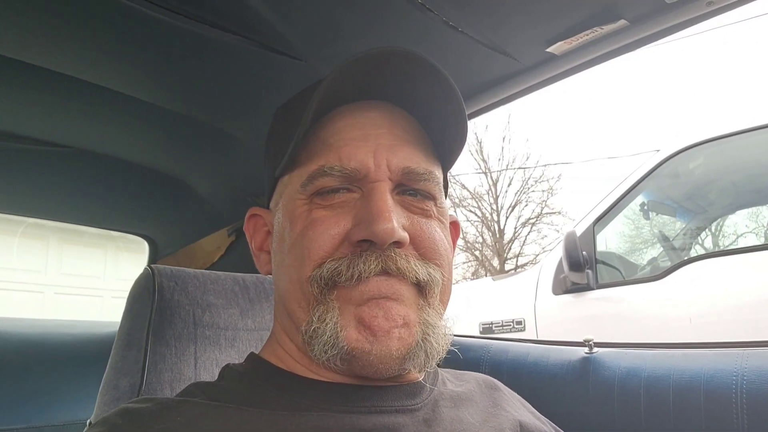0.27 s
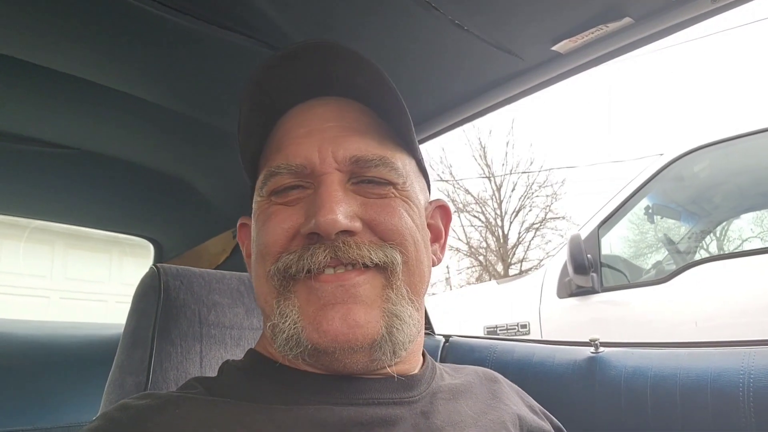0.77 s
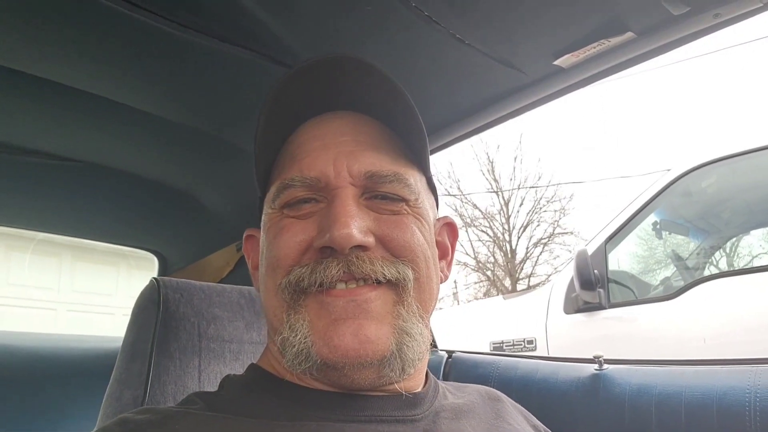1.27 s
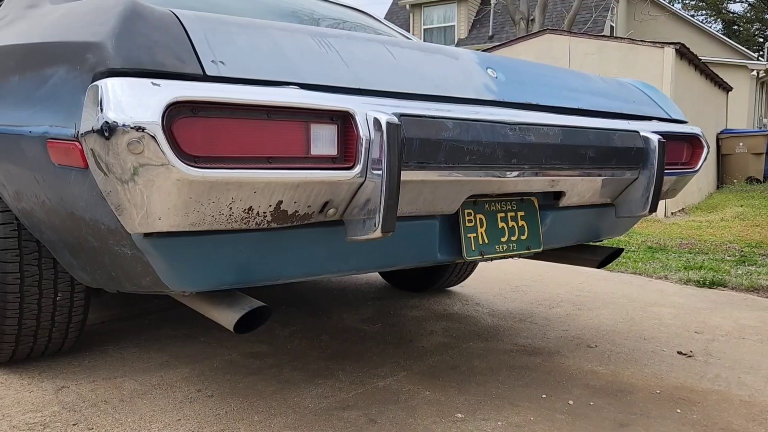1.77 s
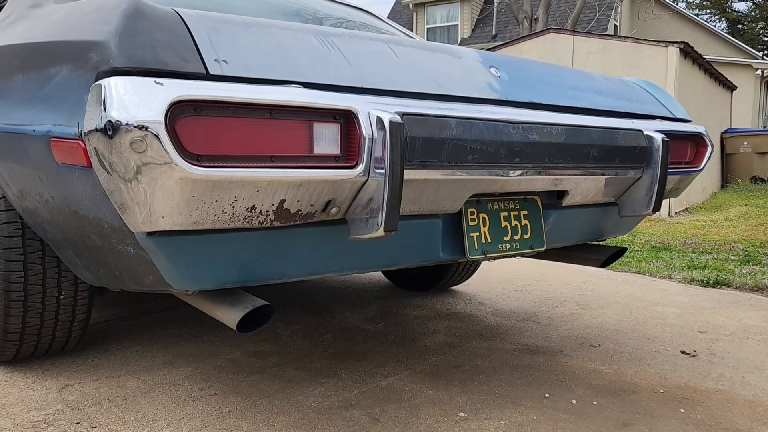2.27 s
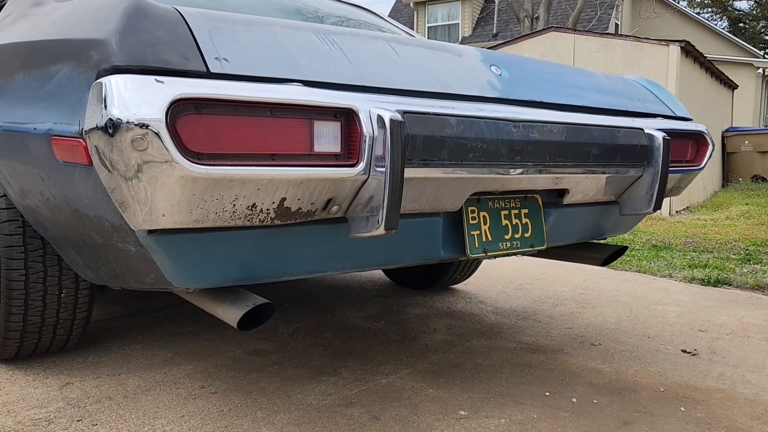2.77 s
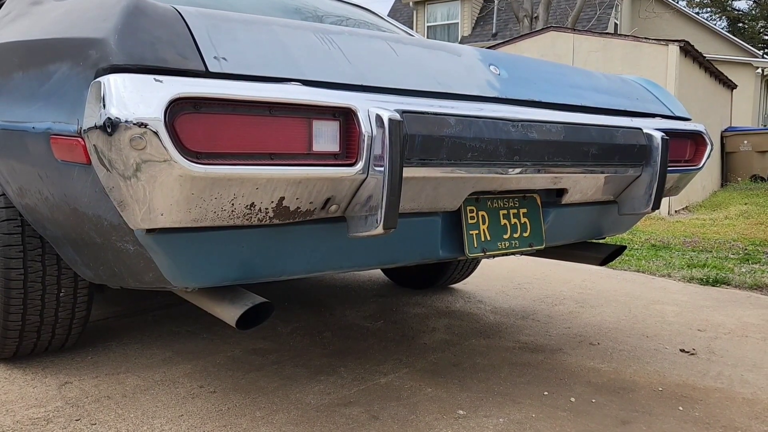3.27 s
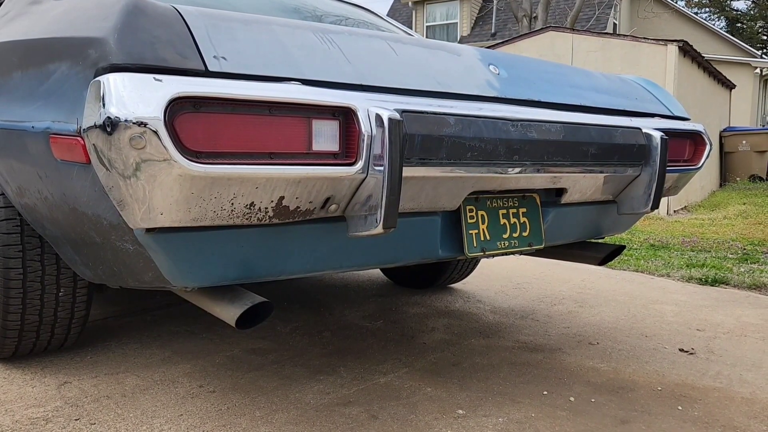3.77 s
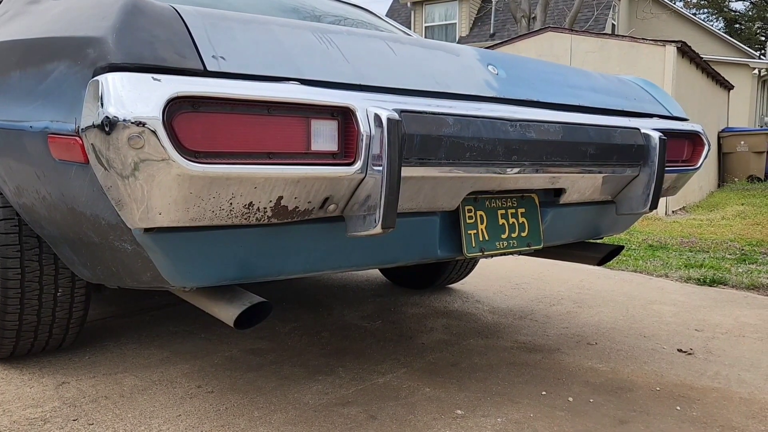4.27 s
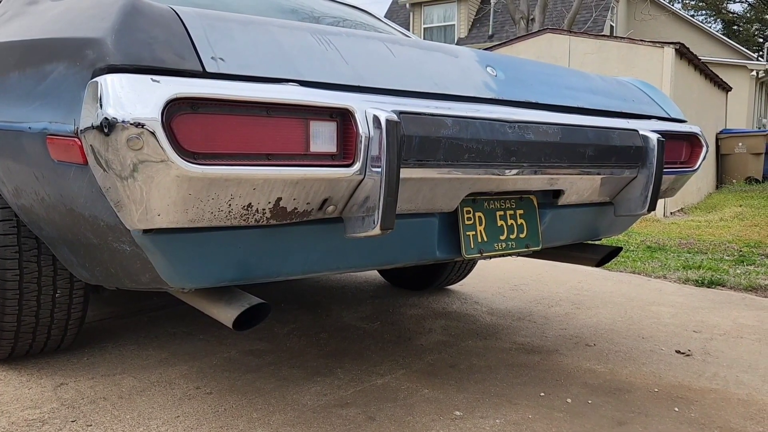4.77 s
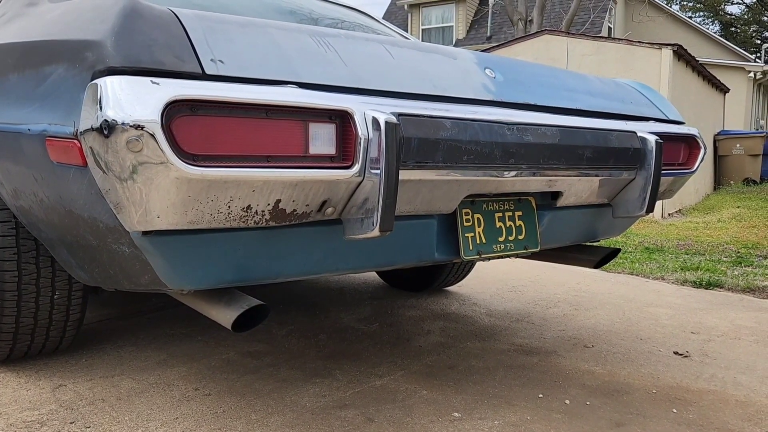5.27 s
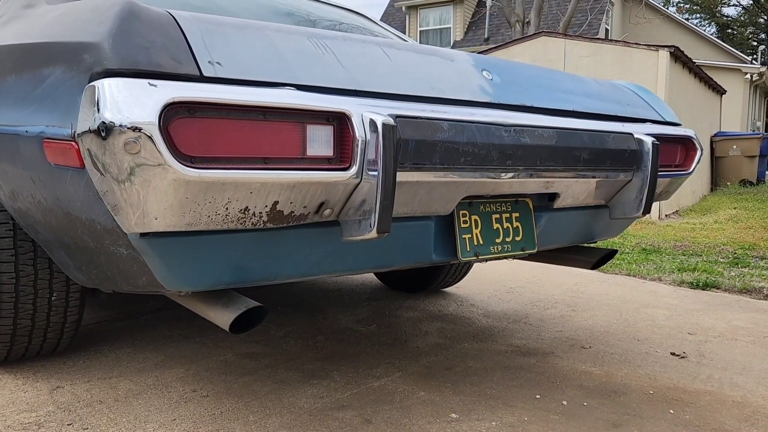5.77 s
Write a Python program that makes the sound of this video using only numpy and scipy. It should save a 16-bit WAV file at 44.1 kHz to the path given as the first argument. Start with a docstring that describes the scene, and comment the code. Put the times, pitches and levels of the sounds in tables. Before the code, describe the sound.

After a quiet outdoor moment, a starter clashes and whines, and a large petrol engine fires up and idles with throbbing exhaust.

```python
"""A big V8 with twin tailpipes starts on a driveway, heard from just behind the bumper.
Over faint outdoor air a soft hiss flares twice, small birds whistle and a hand bumps the microphone.
At 1.9 s the starter pinion clashes into the flywheel and cranks for half a second.
At 2.4 s the engine catches with a few hard bangs, then settles to a loping idle near 1000 rpm:
exhaust pulses thump in the pipes, ragged puffs ring them, and gas spits from the near one."""
import sys
import numpy as np
from scipy import signal
from scipy.fft import rfft, irfft, next_fast_len
from scipy.io import wavfile
from scipy.ndimage import uniform_filter1d

SR = 44100
rng = np.random.default_rng(int(sys.argv[2]) if len(sys.argv) > 2 else 0)


def wrap_up_sound(samples):
    """Save the sound to the file named by the first command line argument, as 16-bit audio."""
    columns = np.atleast_2d(samples).T
    # keep every value between -1 and 1, then stretch to whole-number steps
    tamed = np.clip(columns, -1, 1)
    steps = np.round(tamed * 32767).astype(np.int16)
    wavfile.write(sys.argv[1], SR, steps)


N = 265437
TIME, HZ = np.arange(N) / SR, np.fft.rfftfreq(N, 1 / SR)
CATCH_S, BAND_LIMIT_HZ = 2.37, 15700


def amp(db):
    """Decibels to gain."""
    return 10 ** (np.asarray(db) / 20)


def unit(x):
    """Scale to rms 1."""
    return x / np.sqrt(np.mean(x ** 2) + 1e-20)


def read(points, hz):
    """Interpolate a spectrum over log frequency."""
    f, value = np.transpose(points)
    return np.interp(np.log(hz + 1), np.log(f + 1), value)


def wander(hz, hop=16):
    """Random drift of rms 1, rolling off above hz."""
    size = next_fast_len(N // hop + 2)
    rates = np.fft.rfftfreq(size, hop / SR)
    slow = irfft(rfft(rng.standard_normal(size)) * np.exp(-(rates / hz) ** 2), size)
    return unit(np.interp(np.arange(N) / hop, np.arange(size), slow))


def convolve(x, response):
    """Convolve per channel, cut to N samples."""
    return signal.oaconvolve(np.atleast_2d(x), np.atleast_2d(response), axes=1)[:, :N]


def body(spectrum, modes=(), size=8192):
    """Minimum-phase impulse response of a spectrum plus resonant peaks."""
    hz = abs(np.fft.fftfreq(size, 1 / SR))
    peaks_db = sum(lift / (1 + (2 * (hz - f) / width) ** 2) for f, width, lift in modes)
    log_gain = np.log(amp(read(spectrum, hz) + peaks_db))
    return np.fft.ifft(np.exp(signal.hilbert(log_gain).conj())).real


def colour(x, spectrum, modes=()):
    """Filter with unity power gain for white noise."""
    response = body(spectrum, modes)
    return convolve(x, response / np.linalg.norm(response))


# Likeness of the two microphone ports: (frequency [Hz], correlation [ratio, clipped to 1])
PORT_LIKENESS = [(100, 1), (350, 0.82), (700, 1.2), (1400, 0.47), (3000, 0.05), (6000, 0), (14000, 0.3)]
def noise():
    """Stereo white noise, alike in the bass, less so in the treble."""
    common, separate = rfft(rng.standard_normal((2, N)))
    same = np.clip(read(PORT_LIKENESS, HZ), 0, 1)
    return irfft(np.array([common, same * common + np.sqrt(1 - same ** 2) * separate]), N)


def swirl(x, patchy_db=3.5):
    """Turbulence: random gain patches in time and frequency."""
    spectra = signal.stft(x, nperseg=512, noverlap=384)[2]
    patches = rng.standard_normal(spectra.shape[:0:-1])
    patches = uniform_filter1d(uniform_filter1d(patches, size=7, axis=0), size=4, axis=1)
    gain = unit(amp(patchy_db * unit(patches)))
    return signal.istft(spectra * gain.T, nperseg=512, noverlap=384)[1][:, :N]


def swell(start_s, length_s, attack_s, fade_db_per_s):
    """Envelope: rise, hold until length_s, fade."""
    age = TIME - start_s
    return np.clip(age / attack_s, 0, 1) * amp(-fade_db_per_s * np.maximum(age - length_s, 0))


def clicks(s, db):
    """One impulse at each time."""
    at = np.clip(np.round(np.asarray(s) * SR).astype(int), 0, N)
    return np.bincount(at, amp(db), N + 1)[:N]


def puffs(s, db, rise_s, decay_s):
    """Envelope: quick rise and slower fall at each time."""
    t = TIME[:SR // 4]
    shape = (1 - np.exp(-(t / rise_s) ** 2)) * np.exp(-t / decay_s)
    return convolve(clicks(s, db), shape / shape.max())[0]


def from_left(x, lag_s):
    """A source on the left reaches the right port later."""
    return np.array([x[0], np.pad(x[-1], (round(lag_s * SR), 0))[:N]])


def underbody(x, wet_db, decay_s=0.0056, count=40):
    """Early reflections off concrete, bumper and floor pan."""
    echoes = np.zeros((2, SR // 30))
    at = rng.integers(SR // 2000, echoes.shape[1], (2, count))
    np.put_along_axis(echoes, at, rng.choice([-1., 1.], at.shape) * np.exp(-at / SR / decay_s), 1)
    echoes *= amp(wet_db) / np.linalg.norm(echoes, axis=1, keepdims=True)
    return (x + convolve(x, echoes)) / np.hypot(1, amp(wet_db))


# Outdoor air, low rumble, soft hiss: (frequency [Hz], relative level [dB])
AIR_SPECTRUM = [(12, -15), (20, -5.5), (62, 4), (108, -11.5), (421, -35), (484, -28), (1080, -35.5),
                (1880, -27), (3090, -18.5), (3970, -32.5), (5240, -29.5), (6910, -35.5), (7510, -38.5),
                (9110, -56), (15000, -51)]
RUMBLE_SPECTRUM = [(30, -21), (70, -1), (110, 4.5), (170, -6), (300, -29.5), (520, -25), (900, -55),
                   (3000, -70)]
FLARE_SPECTRUM = [(120, -54), (200, -13), (534, -17.5), (763, -26), (847, -10), (1070, -14.5),
                  (1860, -14.5), (2130, -3), (3040, -28), (3690, -21), (7000, -65), (9100, -77),
                  (15400, -120)]
# Flares of the hiss: (time [s], level [dB])
HISS_FLARES = [(0, -48.5), (1.315, -55.5)]
def outdoors(air_db=-55, rumble_db=-59.5, outside_s=1.32):
    """Thin air, a hiss that flares and fades, and far-off rumble, fuller once outside the cabin."""
    air = colour(swirl(noise(), patchy_db=1.0), AIR_SPECTRUM) * amp(air_db)
    outside = np.clip((TIME - outside_s) / 0.051, 0, 1)
    rumble = colour(noise(), RUMBLE_SPECTRUM) * amp(rumble_db) * outside
    flare = sum(amp(db) * swell(s, 0.0019, attack_s=0.0019, fade_db_per_s=91) for s, db in HISS_FLARES)
    return air + rumble + colour(noise(), FLARE_SPECTRUM) * flare


# Whistles: (time [s], length [s], pitch [Hz], starting offset [Hz], level [dB])
BIRD_WHISTLES = [(0.209, .06, 4520, 148, -65), (0.341, 0.054, 5080, -300, -59),
                 (0.322, 0.2, 3414, -100, -56), (0.406, 0.14, 5840, 250, -62.5),
                 (1.038, .07, 8750, 350, -80), (1.103, 0.043, 5280, 350, -57),
                 (1.132, 0.17, 6140, -200, -65.5), (1.145, 0.06, 7900, -350, -70),
                 (1.197, 0.039, 7160, 250, -61), (1.222, 0.072, 4680, 300, -55), (1.26, 0.04, 3030, 8, -58),
                 (1.372, 0.055, 5640, 252, -59), (1.489, .18, 5530, 195, -54), (1.65, 0.24, 4080, 450, -54),
                 (1.843, .04, 7300, 150, -70), (1.88, 0.093, 8250, -350, -66)]
# Buzzy chirps: (time [s], pitch [Hz], level [dB])
BIRD_BUZZES = [(.243, 4120, -61), (.372, 4010, -55), (.478, 2950, -59), (.885, 2880, -65),
               (.988, 2980, -66), (1.4, 4080, -59), (1.472, 2890, -59)]
def birds(slide_s=0.0215, whistle_width_hz=68, buzz_s=0.037, buzz_width_hz=460, wet_db=-4):
    """Fluttering whistles slide onto pitch among short buzzes; houses scatter a faint echo."""
    notes = [(*row, whistle_width_hz) for row in BIRD_WHISTLES]
    notes += [(s, buzz_s, hz, 0, db, buzz_width_hz) for s, hz, db in BIRD_BUZZES]
    quaver_hz = 12 * wander(60)
    rasp = unit(uniform_filter1d(rng.standard_normal(N), size=40))
    song = np.zeros(N)
    for s, length_s, pitch_hz, offset_hz, db, width_hz in notes:
        t = TIME[:round(length_s * SR)]
        span = slice(round(s * SR), round(s * SR) + len(t))
        hz = pitch_hz + offset_hz * np.exp(-t / slide_s) + quaver_hz[span] + width_hz * rasp[span]
        tone = np.sqrt(2) * np.sin(2 * np.pi * np.cumsum(hz) / SR)
        song[span] += amp(db) * signal.windows.tukey(len(t), .5) * tone
    flutter_db = 3 * wander(36)
    song *= unit(amp(flutter_db))
    scatter = rng.standard_normal((2, SR // 3)) * np.exp(-TIME[:SR // 3] / 0.045)
    return song + amp(wet_db) * convolve(song, scatter / np.linalg.norm(scatter[0]))


# Bumps: (time [s], pitch [Hz], half-width [s], peak [dB])
HAND_BUMPS = [(.603, 140, 0.013, -27), (1.117, 74.6, 0.018, -40)]
# Scuffs and ticks: (time [s], length [s], level [dB], cutoff [Hz])
HAND_SCUFFS = [(0.309, 0.074, -59.5, 2410), (0.429, 0.053, -60.5, 4670), (0.529, 0.046, -54, 940),
               (0.871, 0.0092, -61, 12000), (1.104, 0.0094, -60, 4000)]
def handling():
    """A hand bumps and rubs the microphone."""
    out = np.zeros(N)
    for s, hz, width_s, db in HAND_BUMPS:
        out += amp(db) * np.exp(-((TIME - s) / width_s) ** 2) * np.cos(2 * np.pi * hz * (TIME - s))
    for s, length_s, db, cutoff_hz in HAND_SCUFFS:
        lowpass = signal.butter(2, cutoff_hz, fs=SR)
        rub = signal.lfilter(*lowpass, rng.standard_normal(round(length_s * SR)))
        out[round(s * SR):][:len(rub)] += amp(db) * unit(rub) * signal.windows.tukey(len(rub), .5)
    return out


# Starter slows on compression, then runs free: (time [s], gear mesh [Hz], effort [dB])
STARTER_RUN = [(1.96, 566, 2), (2.02, 633, -1), (2.13, 620, 1.5), (2.18, 509, -5), (2.225, 530, 0),
               (2.28, 560, 2), (2.35, 645, -0.5), (2.46, 754, 6)]
# Pinion clash, gear rattle, churned air: (frequency [Hz], relative level [dB])
CLASH_SPECTRUM = [(88, -35), (150, -9.5), (367, -2), (429, -17), (553, -1), (622, -16), (918, -21),
                  (1180, -21), (1460, 2.5), (2290, -8.5), (3070, -6), (5200, -10.5), (15800, -31)]
RATTLE_SPECTRUM = [(120, -32), (200, -7), (386, -13.5), (439, -5), (472, -14.5), (656, -0.5), (788, -5),
                   (981, -4.5), (1730, -11.5), (1890, -12), (5370, -18), (6800, -29), (14700, -43.5),
                   (15800, -62)]
CHURN_SPECTRUM = [(13, -36), (22, 7), (54, -11), (81, 8), (124, -13), (138, 1.5), (156, -19.5),
                  (300, -19.5), (390, -35), (660, -120)]
# Flywheel ring: (frequency [Hz], width [Hz], lift [dB])
FLYWHEEL_MODES = [(560, 37, 15.5), (1540, 110, 0.5), (2060, 76, 8.5), (3104, 30, 8.5), (3640, 86, 6),
                  (5110, 70, 12)]
def starter(clash_db=-16, whine_db=-39, rattle_db=-31, churn_db=-30, waver=0.01684):
    """The pinion strikes the flywheel; its teeth whine and rattle while the pistons churn air."""
    s, mesh_hz, effort_db = np.transpose(STARTER_RUN)
    engaged = swell(start_s=1.912, length_s=0.523, attack_s=0.026, fade_db_per_s=375)
    effort = amp(np.interp(TIME, s, effort_db)) * engaged
    phase = 2 * np.pi * np.cumsum(np.interp(TIME, s, mesh_hz) * (1 + waver * wander(84))) / SR
    teeth = 1 + 0.18 * np.cos(phase)
    strike = puffs([1.931], [clash_db], rise_s=0.0078, decay_s=0.029)
    clash = colour(noise() * teeth * strike, CLASH_SPECTRUM, FLYWHEEL_MODES)
    whine = sum(gain * np.cos(k * phase) * (1 + 0.47 * wander(40))
                for k, gain in enumerate([1, 0.89, 0.25], 1))
    rattle = colour(swirl(noise()) * teeth * amp(0.35 * wander(90)), RATTLE_SPECTRUM)
    gears = amp(rattle_db) * rattle + amp(whine_db) * unit(whine)
    metal = underbody(from_left(clash + gears * effort, lag_s=0.00029), wet_db=-4.5)
    return metal + amp(churn_db) * colour(noise(), CHURN_SPECTRUM) * effort


# Gas gusts: (time [s], length [s], level [dB])
GAS_GUSTS = [(2.321, 0.16, -24), (2.607, 0.052, -31.5)]
def gusts():
    """Envelope of the gas rushing out as the first cylinders light."""
    return sum(amp(db) * swell(s, length_s, attack_s=0.062, fade_db_per_s=109)
               for s, length_s, db in GAS_GUSTS)


# Crankshaft speed: (time [s], speed [rpm])
CRANK_SPEED = [(2.37, 704.2), (2.58, 972.4), (2.68, 1000.0), (2.8, 945.8), (3.26, 966.9), (3.48, 1004.9),
               (3.76, 973.6), (4.34, 999.0), (4.78, 983.5), (4.86, 1006.4), (5.42, 1026.8), (6.02, 992.4)]
# Cylinders: (crank angle [deg of 720], pipe [0 near, 1 far], thump [dB], bark [dB], hiss [dB])
FIRING_ORDER = [(40, 0, -1, -4, 0), (132, 1, 3, -6, -17), (230, 1, 1, -3, -14), (310, 0, -1, -2, -2.5),
                (398, 1, -5, 0, -14), (492, 0, -1, -3, -4), (582, 0, 3, -5, -5), (678, 1, 1, 1, -12)]
def firings(cycles=40):
    """Time and cylinder of each exhaust pulse; every cylinder fires once in two turns."""
    s, rpm = np.transpose(CRANK_SPEED)
    crank_deg = np.cumsum(np.interp(TIME, s, rpm, left=0)) * 360 / 60 / SR
    due_deg = (np.arange(cycles)[:, None] * 720 + np.array(FIRING_ORDER)[:, 0]).ravel()
    due_deg = due_deg[due_deg < crank_deg[-1]]
    return np.interp(due_deg, crank_deg, TIME), np.arange(len(due_deg)) % len(FIRING_ORDER)


def running(x, idle_db, catch_db, settle_s, growth_db_per_s):
    """Exhaust level: starts at the catch, offset by catch_db, settles, then slowly grows."""
    idle_rms = np.sqrt(np.mean(x[..., N // 2:] ** 2))
    age = np.maximum(TIME - CATCH_S, 0)
    db = idle_db + catch_db * np.exp(-(age / settle_s) ** 2) + growth_db_per_s * age
    return x / idle_rms * (age > 0) * amp(db)


# Gas jet: (frequency [Hz], relative level [dB])
JET_SPECTRUM = [(1000, -38.5), (1700, -4), (2360, -8), (3100, -3), (3790, 1), (4400, -1.5), (5400, 0.5),
                (6200, -4.5), (6900, -11), (7800, -10.5), (8500, -17.5), (10000, -14.5), (12700, -13),
                (15500, -24)]
# Tailpipe ring: (frequency [Hz], width [Hz], lift [dB])
TAILPIPE_MODES = [(437, 25, 6), (492, 25, 5), (550, 25, 5), (603, 35, 9), (679, 28, 11), (855, 30, 4),
                  (1017, 60, 6), (1187, 25, 4), (1459, 60, 10), (1595, 30, 6), (1851, 25, 6), (2062, 70, 5),
                  (2610, 130, 3), (2980, 80, 4), (3750, 150, 4), (4375, 100, 3), (4750, 90, 4),
                  (5380, 150, 3)]
def hiss(s, cylinder, charge, lag_s=0.00033, lead_s=0.0037, rise_s=0.0012, decay_s=0.0041, uneven_db=3):
    """Gas jets from the pipe mouth just after a small lead puff, hardest on the near bank."""
    db = np.array(FIRING_ORDER)[cylinder, 4] + uneven_db * np.tanh(charge)
    main = puffs(s + lag_s, db, rise_s, decay_s)
    lead = puffs(s + lag_s - lead_s, db - 9, rise_s, decay_s / 2)
    steady = 0.21 * amp(2.0 * wander(100))
    jet = np.hypot(steady, main + lead)
    jet = running(jet, idle_db=-35, catch_db=-1, settle_s=0.5, growth_db_per_s=0.64)
    flow = np.hypot(np.maximum(jet, spits(rise_s, decay_s)), gusts())
    gas = colour(swirl(noise(), patchy_db=3.0) * flow, JET_SPECTRUM, TAILPIPE_MODES)
    return underbody(from_left(gas, lag_s=0.00031), wet_db=-5.5)


# Valve puff: (frequency [Hz], relative level [dB])
BARK_SPECTRUM = [(150, -36), (230, 1), (290, -8.5), (365, -15.5), (679, -15.5), (770, -22.5), (974, -19.5),
                 (1460, -24.5), (1750, -32), (2600, -32.5), (3400, -72), (5700, -100)]
def bark(s, cylinder, uneven_db=2.0, decay_s=0.0073, lag_s=0.00196, rough=0.39, steady=0.67):
    """Each exhaust valve releases its own ragged puff, alike every cycle, ringing the tailpipes."""
    db = np.array(FIRING_ORDER)[cylinder, 3] + uneven_db * rng.standard_normal(len(s))
    t = TIME[:SR // 20]
    valve_puffs = rng.standard_normal((len(FIRING_ORDER), len(t))) * np.exp(-t / decay_s)
    repeating = sum(convolve(clicks(s[cylinder == k] + lag_s, db[cylinder == k]), puff)
                    for k, puff in enumerate(valve_puffs))
    turbulent = noise() * (steady + puffs(s + lag_s, db, 0.00035, decay_s))
    ring = colour(repeating + rough * turbulent, BARK_SPECTRUM, TAILPIPE_MODES)
    ring = from_left(ring, lag_s=0.00018)
    return running(ring, idle_db=-33, catch_db=5, settle_s=0.41, growth_db_per_s=1.1)


# Low pipe resonances: (frequency [Hz], relative level [dB])
NEAR_PIPE_SPECTRUM = [(20.0, -4.8), (40.0, -11.1), (65.0, -10.5), (90.0, 11.6), (115.0, 3.0),
                      (140.0, -12.4), (170.0, 8.7), (205.0, -19.6), (245.0, -11.3), (320.0, -40.6),
                      (430.0, -58.4), (800.0, -71.2), (3000, -111)]
FAR_PIPE_SPECTRUM = [(20.0, -4.9), (40.0, -9.5), (65.0, -10.1), (90.0, 2.5), (115.0, 3.1), (140.0, -25.1),
                     (170.0, -19.2), (205.0, -27.0), (245.0, -12.6), (320.0, -23.5), (430.0, -43.7),
                     (800.0, -59.6), (3000, -100)]
def thump(s, cylinder, charge, uneven_db=1.12, jitter_s=0.00008):
    """Each bank fires unevenly into its own pipe, whose low resonances make the lope."""
    _, pipe, db, _, _ = np.array(FIRING_ORDER)[cylinder].T
    s = s + jitter_s * rng.standard_normal(len(s))
    db = db + uneven_db * charge
    near = convolve(clicks(s[pipe == 0], db[pipe == 0]), body(NEAR_PIPE_SPECTRUM))
    far = convolve(clicks(s[pipe == 1], db[pipe == 1]), body(FAR_PIPE_SPECTRUM))
    return -running(near + far, idle_db=-16.2, catch_db=-4, settle_s=0.28, growth_db_per_s=0.44)


# Hard firings: (time [s], relative bang level [dB], spit level [dB])
HARD_FIRINGS = [(2.3797, -3.5, -18), (2.4209, -3.5, -26), (2.437, -12.5, -13.5), (2.4607, -6.5, -30),
                (2.477, -6, -15.5), (2.496, -4, -16.5), (2.528, -8.5, -15), (2.56, -10, -34),
                (2.621, -19.5, -23), (2.697, -12.5, -18.5), (2.774, -22, -26), (2.903, -16, -21.5)]
# Bang: (frequency [Hz], relative level [dB])
BANG_SPECTRUM = [(25, -48), (70, 9), (150, 1.5), (260, -3), (400, -17.5), (700, -16), (1500, -11.5),
                 (2200, -23), (6000, -35.5)]
def bangs(gain_db=15, rasp_db=-22):
    """The first rich charges go off hard, each with a rasping tail."""
    s, db, _ = np.transpose(HARD_FIRINGS)
    rasp = amp(rasp_db) * noise() * puffs(s, db, rise_s=0.0023, decay_s=0.01)
    blast = colour(clicks(s + 0.00049, db) + rasp, BANG_SPECTRUM, TAILPIPE_MODES)
    return amp(gain_db) * from_left(blast, lag_s=0.00013)


def spits(rise_s, decay_s, lag_s=0.0012):
    """Envelope of the gas spat from the near pipe after each bang."""
    s, _, db = np.transpose(HARD_FIRINGS)
    return puffs(s + lag_s, db, rise_s, decay_s)


def radiate(x, corner_hz=34):
    """An open pipe end radiates almost no deep bass."""
    hz = np.fft.rfftfreq(2 * N, 1 / SR)
    highpass = 1 - np.exp(-(hz / corner_hz) ** 4)
    return irfft(rfft(x, 2 * N) * highpass)[..., :N]


def scene():
    """Driveway, starter and engine; each charge burns a little stronger or weaker."""
    s, cylinder = firings()
    charge = rng.standard_normal(len(s))
    pulses = radiate(thump(s, cylinder, charge) + bangs())
    engine = pulses + bark(s, cylinder) + hiss(s, cylinder, charge)
    return engine + starter() + birds() + handling() + outdoors()


# Microphone port imbalance: (frequency [Hz], left minus right [dB])
PORT_BALANCE = [(150, 0.5), (330, 0.5), (700, -2), (1400, 0.5), (2700, -6), (4200, -4), (6400, 0.5),
                (9800, 13), (14500, 1.5)]
def record(dry):
    """Colour each port, clip at full scale, band-limit."""
    tilt_db = read(PORT_BALANCE, np.fft.rfftfreq(2 * N, 1 / SR)) / 2
    heard = irfft(rfft(dry, 2 * N) * amp([tilt_db, -tilt_db]))[:, :N]
    lowpass = signal.firwin(511, BAND_LIMIT_HZ, window=("kaiser", 9), fs=SR)
    return signal.oaconvolve(np.clip(heard, -1, 1), lowpass[None], "same")


dry = scene()
out = record(dry)
wrap_up_sound(out)
```